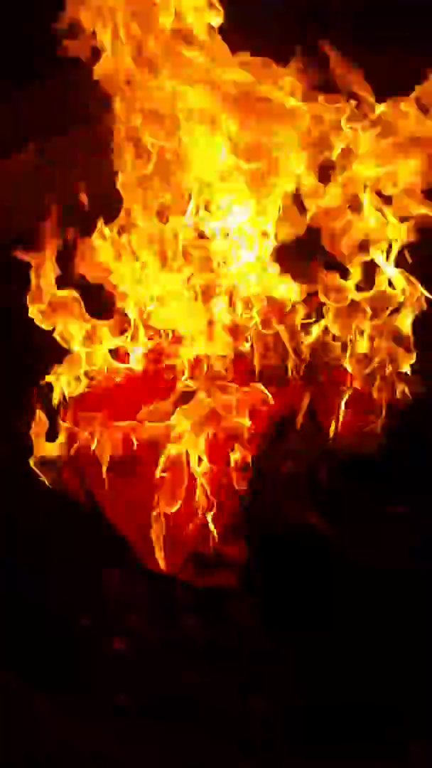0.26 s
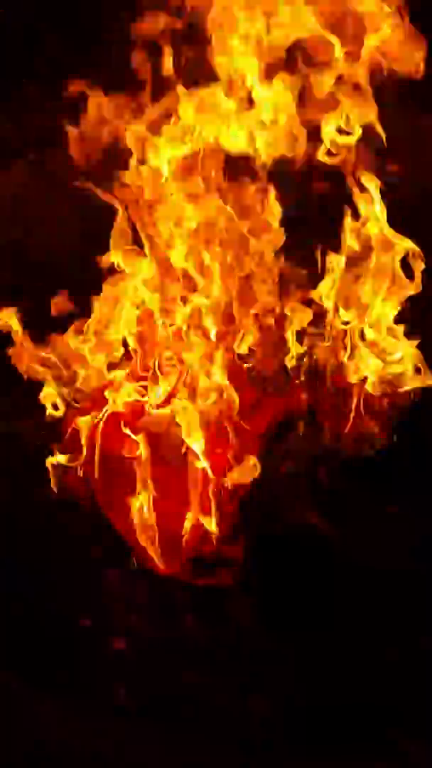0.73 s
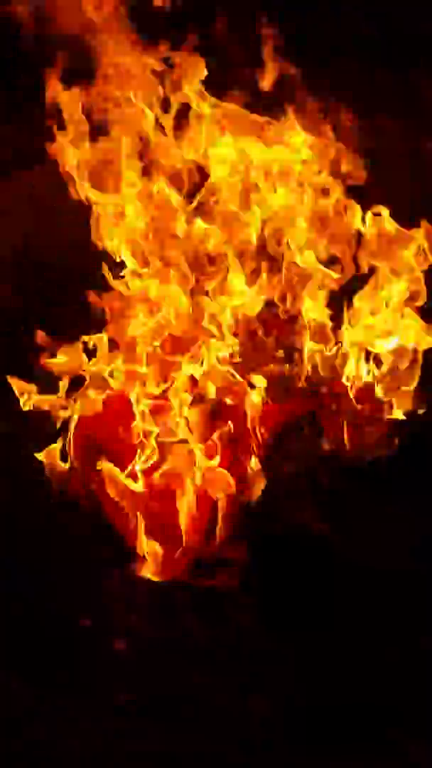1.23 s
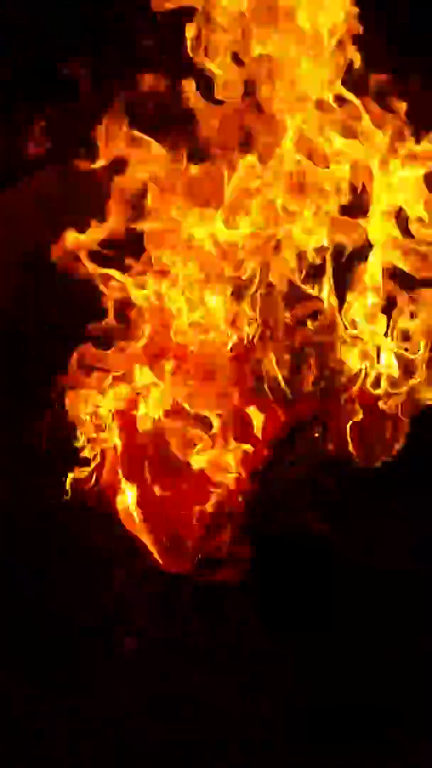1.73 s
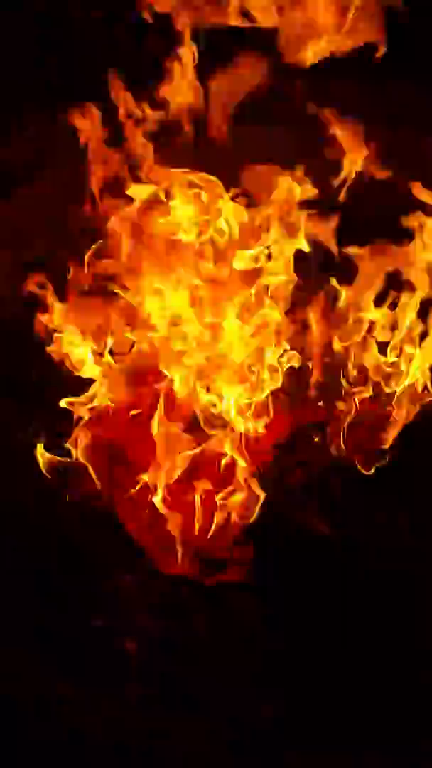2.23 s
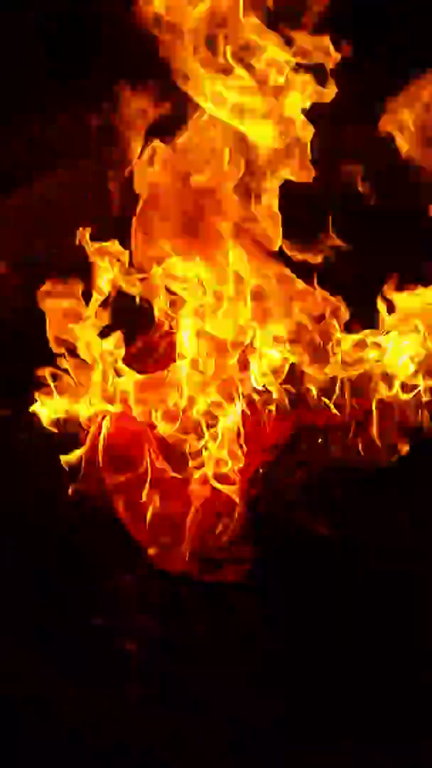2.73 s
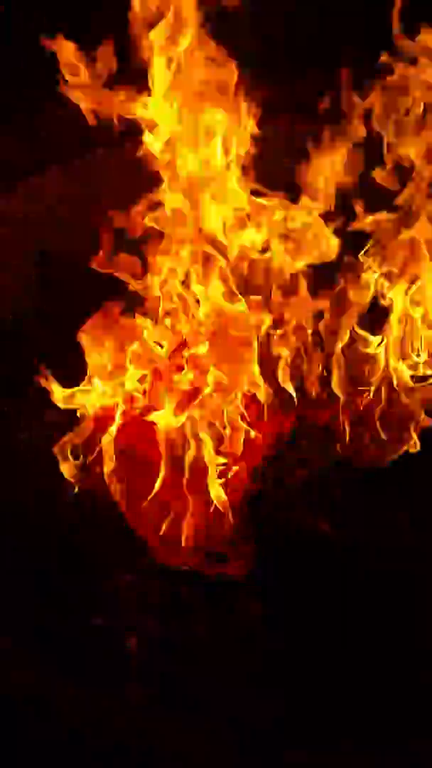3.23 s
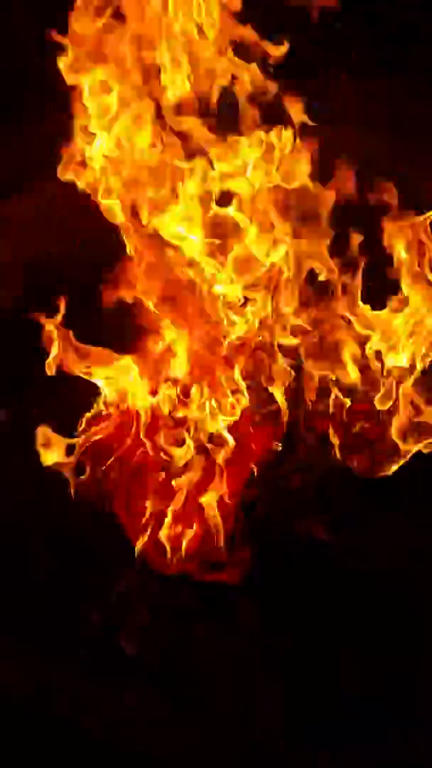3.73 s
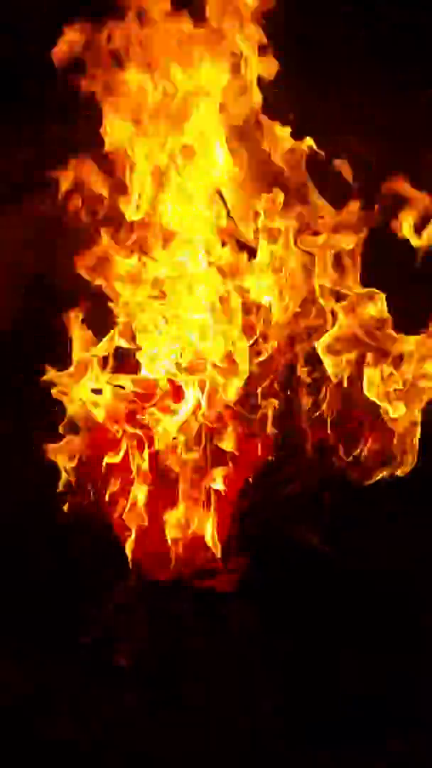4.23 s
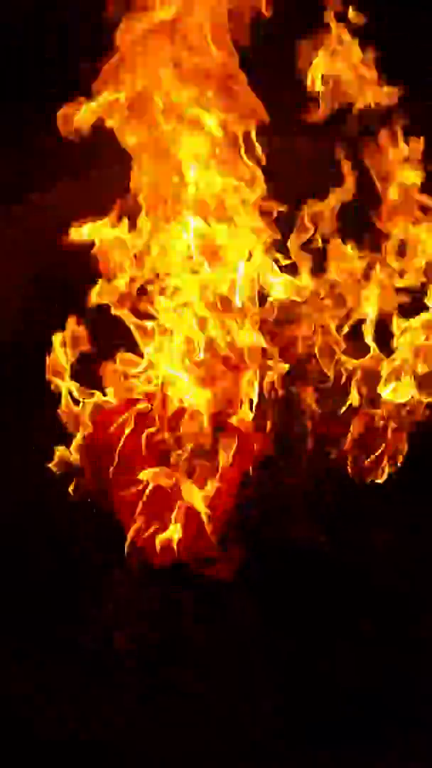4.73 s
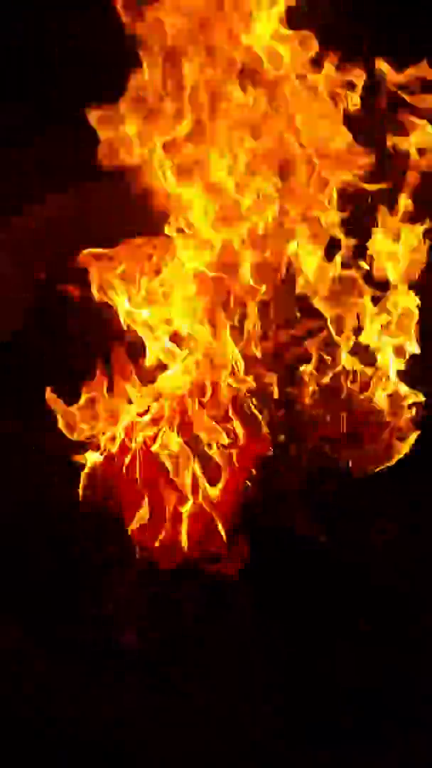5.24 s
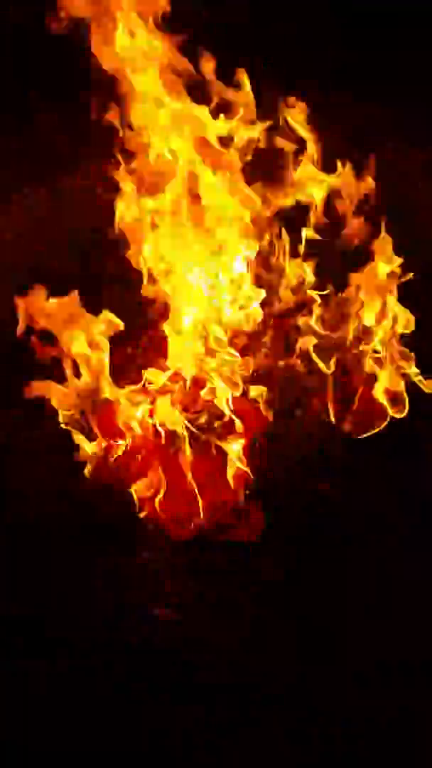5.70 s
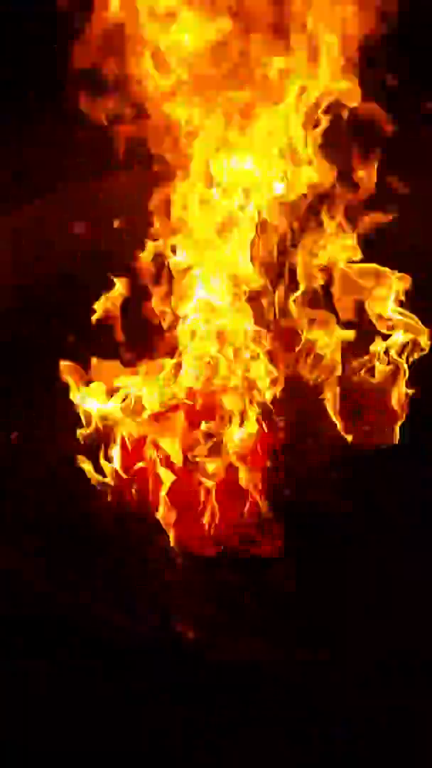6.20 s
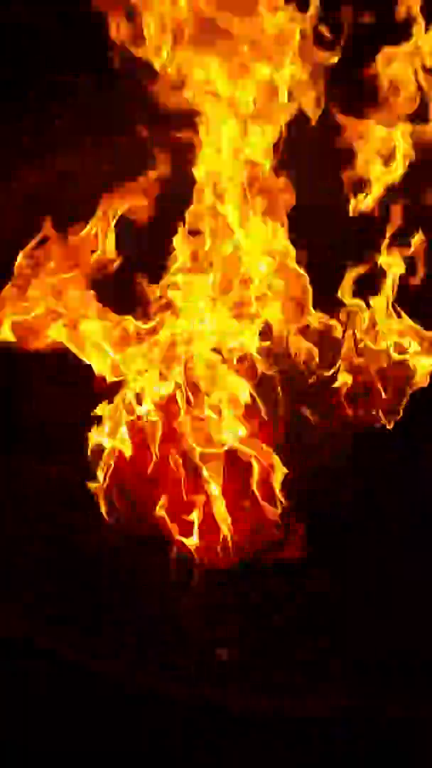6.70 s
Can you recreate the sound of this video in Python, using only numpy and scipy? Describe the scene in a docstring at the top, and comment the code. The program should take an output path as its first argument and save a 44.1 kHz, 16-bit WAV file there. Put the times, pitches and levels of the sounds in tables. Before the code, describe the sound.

A heap of cloth burns close to a handheld stereo microphone, outdoors at night. The sound swells in over the first second: a deep flame rumble under a fine, bright sizzle. Thin, sharp crackles scatter throughout, standing out around 0.6, 1.5, 3.2 and 4.1 seconds and clustering from 5.7 to 6.3. The sizzle peaks near 1.7 seconds, and the rumble gusts near 2.8, 4.1 to 4.5 and 6.5. Soft, dull pops come around 0.5, 2.6, 4.3 and 5.9 seconds. Insects chirr steadily all around, with short cricket trills and a steady high hiss mostly on the left. A distant engine holds a low hum, rising slightly in pitch, and fades out at about 4 seconds. After a momentary dip at 4.6 seconds, everything turns quieter and duller from about 5 to 5.7, then recovers and continues until about 7 seconds.

```python
"""A heap of cloth burns close to a two-port handheld microphone, outdoors at night.
Turbulent flames roar low and sizzle; snapping fibres crackle and pockets of gas pop.
All round, insects chirr as their strokes excite resonant wings, and an engine drones far off.
Steady bands of high hiss lie mostly on the left.
The whole sound swells in at the start and, after a brief dip, sinks for a second near the end."""
import sys
import numpy as np
from scipy import signal
from scipy.io import wavfile
from scipy.ndimage import map_coordinates

SR = 44100
rng = np.random.default_rng(int(sys.argv[2]) if len(sys.argv) > 2 else 0)


def file_out(sig):
    """Save sig as 16-bit WAV at sys.argv[1]."""
    # one column per channel
    cols = np.atleast_2d(sig).T
    # limit, then scale
    lim = np.clip(cols, -1, 1)
    pcm = np.round(lim * 32767).astype(np.int16)
    wavfile.write(sys.argv[1], SR, pcm)


N = 306936

# Deep gusts of the flames: centre_s, boost_db
FLAME_GUSTS = [(0.22, 2.5), (1.15, 1), (2.75, 4.5), (3.08, 2.5), (3.42, 1), (4.1, 3), (4.28, 2.5),
               (4.53, 3), (4.85, 2), (6.55, 4)]
# Flame noise spectrum, before rumble and rush are balanced: frequency_hz, relative_density_db
ROAR_SPECTRUM = [(20, -18), (45, -1), (70, 0.5), (89, 0), (110, -2.5), (150, -7.5), (290, -18.5),
                 (390, -24.5), (560, -26.5), (1000, -27.5), (1670, -37.5), (2400, -25)]
def flame_roar(level_db, sunk_db, gust_sigma_s=0.071, throb_hz=89.7):
    """Turbulent combustion: unsteady heat release radiates a deep rumble and a rush above it."""
    t = np.arange(N) / SR
    noise = banded_noise(ROAR_SPECTRUM, low_hz=20.24, patchy_db=1.56, count=21)
    rumble, rush = split(noise, hz=193)
    throb = resonate(rumble, throb_hz, width_hz=23)
    rumble = rms_one(rms_one(rumble) + amp(-9) * rms_one(throb))
    gust_db = sum(db * np.exp(-((t - s) / gust_sigma_s) ** 2 / 2) for s, db in FLAME_GUSTS)
    rumble *= amp(13 - 0.15 * sunk_db + gust_db)
    warm, thin = split(rms_one(rush), hz=567)
    rush = amp(2 - 0.12 * sunk_db) * warm + amp(0.5 + 0.6 * sunk_db) * thin   # duller when quieter
    return amp(level_db) * (rumble + rush)


# Spectrum shared by hiss and sizzle, before they are balanced: frequency_hz, relative_density_db
SIZZLE_SPECTRUM = [(1500, -45), (2200, -8), (3500, 11), (5200, 12), (6300, 12.5), (8200, -7), (10000, 2.5),
                   (13000, -6.5), (15500, 2.5)]
def flame_sizzle(level_db, sizzle_db, sunk_db, spits_per_s=170, spit_decay_s=0.0015, top_hz=16050):
    """Shot-noise modulation: above a smooth hiss, the treble leaps whenever a thread spits."""
    noise = banded_noise(SIZZLE_SPECTRUM, low_hz=1400, patchy_db=0.9, count=11)
    hiss, sizzle = split(noise, hz=7800)
    hiss = amp(level_db - 8.5 + 0.6 * sunk_db) * rms_one(hiss)
    spits = (rng.random(N) < spits_per_s / SR) * rng.exponential(1.0, N)
    grain = 1 + signal.lfilter([1], [1, -np.exp(-1 / (spit_decay_s * SR))], spits)
    lowpass = signal.cheby2(12, 40, top_hz, fs=SR, output="sos")
    sizzle = signal.sosfilt(lowpass, rms_one(sizzle * grain)) * amp(sizzle_db + 1.6 * drift(20))
    lower, upper = split(sizzle, hz=11500)
    return hiss + upper + amp(0.33 * sunk_db) * lower   # as the whole sound dips, the sizzle thins


def snap(noise, hz, crack_db, knock_db, bounce_s, clean):
    """Impulse response: a breaking fibre excites three damped bands; scattering and an echo follow."""
    t = np.arange(len(noise)) / SR
    ragged = noise * t * np.exp(-t / 0.00022)
    clean_break = clean * (np.arange(len(t)) == 5)
    burst = ragged / np.sqrt(np.sum(ragged ** 2)) + clean_break
    bright = resonate(resonate(burst, hz, 6500), 12500, 15000)
    crack = resonate(resonate(burst, 5400, 5000), 5400, 5000)
    knock = resonate(resonate(burst, 1800, 2600), 1800, 3000)
    click = rms_one(bright) + amp(crack_db) * rms_one(crack) + amp(knock_db) * rms_one(knock)
    heap_scatter = signal.fftconvolve(click, noise[::-1] * np.exp(-t / 0.004))[:len(t)]
    ground_bounce = np.roll(click, int(bounce_s * SR))
    return click + amp(-29) * heap_scatter + amp(-21) * ground_bounce


# Loudest snaps (crack and knock relative to the ring): start_s, gain_db, ring_hz, crack_db, knock_db
FIBRE_SNAPS = [(0.2145, -44, 12100, -5, -12), (0.444, -48, 10100, -10, -20), (0.5113, -43, 12800, -12, -12),
               (0.5318, -50, 9900, -12, -18), (0.5637, -55, 14000, -12, -22),
               (0.6492, -35.5, 12800, -12, -14), (0.6744, -47, 10500, -2, -22),
               (0.703, -52, 10000, -14, -20), (0.7353, -50, 10300, -14, -20),
               (0.7722, -53, 10100, -8.5, -6), (0.8369, -38, 9900, -19, -17), (0.853, -48, 11000, -2, -14),
               (0.9383, -53, 14000, -14, -20), (0.9523, -50, 14000, -12, -17.5),
               (0.9975, -53, 13000, -6, 1), (1.1054, -40.5, 12900, -10, -19), (1.1638, -46, 11500, -3, -25),
               (1.1895, -43, 14100, -12, -25.5), (1.2198, -40, 11400, -11, -18),
               (1.2883, -49, 12700, -7, 0), (1.3145, -48.5, 14000, -10, -22),
               (1.4101, -46, 12280, 3.5, -2.5), (1.5398, -32, 10000, -9.5, -21.5),
               (1.6155, -38, 12800, -5, -15.5), (1.6259, -35, 9900, -10, -18),
               (1.6702, -37.5, 10900, -28.5, -17), (1.7435, -53, 10000, -14, -22),
               (1.7699, -48, 10100, -14, -22), (1.8149, -35.5, 12100, -26, -9),
               (1.8836, -41.5, 12700, -23, -10), (1.9026, -49, 11000, -14, -22),
               (1.9344, -44, 11300, -8, -29), (2.0315, -38.5, 12400, -8, -28),
               (2.1581, -56, 13800, -14, -22), (2.1825, -49, 10200, -14, -22),
               (2.1902, -44, 11400, -18, -3.5), (2.3618, -49, 13400, -13, -19),
               (2.5088, -48, 10000, -12, -22), (2.5488, -41, 11200, -7, -26),
               (2.5691, -48, 14000, -14, -20), (2.594, -43, 11800, -13, -13), (2.6596, -41.5, 9500, 0, -11),
               (2.7428, -39, 10900, -20.5, -22), (2.7851, -61, 14000, -14, -20),
               (3.2018, -32, 8750, -6, -16.5), (3.4234, -37, 10500, -16, -25),
               (3.434, -43, 11600, -14, -18), (3.498, -54, 10500, -14, -18.5),
               (3.5823, -53, 13600, -14, -20), (3.6047, -45, 9900, 0, -7), (3.686, -46, 10400, -15, -23.5),
               (3.73, -53, 10000, -10, -19.5), (3.7659, -53, 13000, -6, -1), (3.7998, -59, 12700, -9, -20),
               (3.8243, -45, 13400, -8, -10), (3.9339, -41.5, 12300, -24, -28),
               (3.9644, -48, 12000, -14, -20), (4.0218, -50, 12400, -14, -20),
               (4.0536, -45, 10600, -11, -12), (4.0609, -37.5, 12000, -5, -27),
               (4.0999, -34.5, 11900, -26, -18), (4.1267, -33, 11200, -7, -17.5),
               (4.1643, -41, 11700, -22, -27), (4.2574, -39.5, 10700, -4, -24),
               (4.3346, -46, 10800, -12.5, -20), (4.3576, -47, 11100, -11, -17),
               (4.399, -44.5, 12200, -12, -31), (4.45, -37.5, 11500, -12, -24),
               (4.4797, -43, 10400, -12, -29), (4.598, -47, 9800, -16, -17),
               (4.6137, -37.5, 11400, -3.5, -10), (4.7146, -44.5, 14700, -10.5, -12),
               (4.7547, -51, 13400, -12, -20), (4.7925, -38, 11400, -13, -50),
               (4.8335, -51, 14000, -12, -22), (4.8684, -51, 14000, -16, -26),
               (4.9263, -44, 12700, -15, -33.5), (4.98, -48.5, 13500, -10, -27.5),
               (5.0098, -42.5, 11300, -28, -29), (5.055, -53, 12500, -12, -20),
               (5.09, -57, 12700, -12, -20), (5.111, -49, 12500, -13, -16), (5.1463, -43, 14000, -20, -29),
               (5.2191, -55, 13000, -6, -13), (5.2391, -55, 10000, -12, -20), (5.286, -58, 10400, -9, -20),
               (5.3014, -42, 13100, -14, -29.5), (5.4097, -53, 9800, -4, -14),
               (5.472, -59, 10200, -12, -22), (5.5289, -45.5, 12600, -7, -29),
               (5.639, -59, 13000, -12, -20), (5.7048, -50, 11500, -1.5, -23),
               (5.7164, -37.5, 13800, -9, -24), (5.7585, -36, 13600, -8, -29),
               (5.7953, -47, 11300, -13, -10), (5.8342, -55, 14000, -12, -14),
               (5.9083, -38.5, 13300, -8, -22), (5.9235, -37.5, 11900, -10, -12),
               (5.9425, -38, 12600, -29, -34), (5.9593, -41, 12400, -10, -28),
               (5.995, -34, 10600, -15, -24), (6.0235, -35, 13200, -21, -31),
               (6.0425, -35.5, 13400, -14, -22), (6.0692, -47, 14000, -14, -22),
               (6.137, -46, 11000, -2, -14), (6.1659, -46, 9700, -11, -20),
               (6.2296, -38.5, 11900, -17, -28), (6.2442, -35.5, 11800, -20, -22),
               (6.2677, -53, 12000, -4, 3), (6.2947, -54, 10700, -14, -20), (6.35, -44, 10700, -7, -10),
               (6.5064, -43, 14600, -10, -16), (6.5286, -44, 11300, -22, -10),
               (6.6279, -41, 11700, -20, -22), (6.6506, -43, 13400, -16, -25),
               (6.7431, -50, 10100, -12, -8), (6.7804, -44, 11400, -14, -18)]
def crackles(sizzle_db, size=800, faint_count=14, pan_spread_db=2.5):
    """Acoustic emission: fibres fracture in clicks, which reach the two ports in partly unlike shapes."""
    snaps = list(FIBRE_SNAPS)
    for when, strong, bright, woody in rng.random((faint_count, 4)):
        at = (N - 1) * when
        db = sizzle_db[int(at)] - 9 + 5 * strong ** 2   # faint snaps follow the sizzle
        snaps.append((at / SR, db, 9000 + 5000 * bright, -14 + 12 * woody, -27 + 14 * woody))
    out = np.zeros((2, N + size))
    noises = rng.standard_normal((len(snaps), 2, size))
    bounces_s = rng.uniform(0.0015, 0.004, len(snaps))
    pans_db = pan_spread_db * rng.standard_normal(len(snaps))
    for row, (mid, side), bounce_s, pan_db in zip(snaps, noises, bounces_s, pans_db):
        s, db, hz, crack_db, knock_db = row
        shared = snap(mid, hz, crack_db, knock_db, bounce_s, clean=1.4)
        apart = snap(side, hz, crack_db, knock_db - 5, bounce_s, clean=0)
        pair = 0.73 * shared + 0.6 * apart * [[1], [-1]]
        out[:, int(s * SR):int(s * SR) + size] += panned(pair, pan_db) * amp(db)
    return out[:, :N]


# Dull pops in the heap: start_s, level_db, pitch_hz
GAS_POPS = [(0.393, -59, 600), (0.545, -59.5, 700), (2.592, -54.5, 600), (2.61, -53, 600),
            (3.036, -57.5, 790), (4.051, -61, 720), (4.289, -55, 700), (4.318, -50, 705),
            (5.797, -62.5, 1300), (5.858, -68, 1500), (5.913, -57, 700)]
def pops(size=1200):
    """Heavily damped oscillation: a bursting pocket of gas gives a blunt puff of a few cycles."""
    out, t = np.zeros(N + size), np.arange(size) / SR
    for (s, db, hz), noise in zip(GAS_POPS, rng.standard_normal((len(GAS_POPS), size))):
        pulse = (0.4 * noise + 1) * t * np.exp(-3 * t * hz)
        puff = resonate(resonate(pulse, hz, hz), hz, 1.4 * hz)
        out[int(s * SR):int(s * SR) + size] += amp(db) * rms_one(puff)
    return out[:N]


def wing_strokes(hz, t60_s, per_s, size=N):
    """Stridulation: an insect's uneven strokes drive its wing resonance in a train of tone bursts."""
    count = int(size / SR * per_s) + 2
    jitter, strength = rng.standard_normal((2, count))
    at = (np.cumsum(1 + 0.12 * jitter) - rng.random()) * SR / per_s
    clicks = np.bincount(np.clip(at, 0, size).astype(int), amp(2.25 * strength), size + 1)[:size] + 1e-18
    width_hz = np.log(1000) / (np.pi * t60_s)
    return rms_one(resonate(resonate(clicks, hz, width_hz), hz, width_hz))


# Kinds of singer: wing_hz, spread_hz, ring_t60_s, strokes_per_s, relative_level_db, pan_db
INSECT_KINDS = [(2488, 68, 0.0073, 60, -8, -0.5), (2990, 108, 0.017, 62, 3, 3.5),
                (5730, 260, 0.0093, 62, -7, 10.5), (7050, 180, 0.012, 62, 4, 1.5)]
def insect_chorus(singers=6):
    """Incoherent summation: detuned singers blend into a chirr, a separate crowd in each channel."""
    out = np.zeros((2, N))
    for hz, spread_hz, t60_s, per_s, db, pan_db in INSECT_KINDS:
        crowd = np.zeros((2, N))
        for channel in crowd:
            for detune in np.linspace(-1.5, 1.5, singers):
                song = wing_strokes(hz + spread_hz * detune, t60_s, per_s * rng.uniform(0.9, 1.1))
                channel += song * amp(-1.8 * detune ** 2)
            channel *= amp(0.63 * drift(3))
        out += panned(rms_one(crowd), pan_db) * amp(db)
    return out


# Trills of single crickets: start_s, length_s, wing_hz, glide_hz_per_s, relative_level_db
CRICKET_TRILLS = [(0.35, .2, 5760, 0, -12), (.85, .2, 5760, 0, -10), (1.45, .12, 5920, 0, -9),
                  (1.5, 0.28, 5630, 0, -4.5), (1.72, .17, 5750, 200, -8), (1.93, 0.13, 5930, 0, -7),
                  (2.0, .13, 5700, 0, -9), (2.62, 0.2, 5950, -300, -10), (2.76, 0.2, 5530, -300, -10),
                  (2.98, .27, 5620, 300, -7), (3.28, 0.24, 5720, 400, -10), (3.52, .26, 5890, 700, -9),
                  (4.08, .28, 5550, -600, -8.5), (5.35, .22, 5660, 0, -6), (5.8, 0.22, 5490, 0, -6),
                  (6.68, 0.28, 5830, 800, -9)]
def crickets(waver_hz=45, edge_s=0.039):
    """Frequency modulation: the wing tone glides and wavers within each short, soft-edged trill."""
    out, waver, t = np.zeros(N + SR), drift(8), np.arange(SR // 2) / SR
    for s, length_s, hz, glide_hz_per_s, db in CRICKET_TRILLS:
        start = int(s * SR)
        gate = np.clip(np.minimum(t, length_s - t) / edge_s, 0, 1)
        bend_hz = glide_hz_per_s * (t - length_s / 2) + waver_hz * np.resize(waver[start:], len(t))
        steady = wing_strokes(hz, t60_s=0.014, per_s=60, size=len(t))
        bent = map_coordinates(steady, [np.cumsum(1 + bend_hz / hz)], order=3)
        out[start:start + len(t)] += bent * gate * amp(db)
    return panned(out[:N], pan_db=14)


def far_engine(pitch_hz=133.3, rise_hz_per_s=2.7, leaves_s=3.78, fade_db_per_s=63):
    """Periodic exhaust flow: a near-pure note rises with engine speed and fades as it draws away."""
    t = np.arange(N) / SR
    db = 9 - 0.5 * t - fade_db_per_s * np.maximum(t - leaves_s, 0)
    waver_db = 1.2 * drift(3)
    cycles = pitch_hz * t + rise_hz_per_s * t * t / 2 + rng.random()
    return amp(db + waver_db) * np.sqrt(2) * np.sin(2 * np.pi * cycles)


# Steady bands of high hiss, mostly on the left: centre_hz, width_hz, relative_level_db, pan_db
HISS_BANDS = [(3590, 990, -5.5, 13.5), (4140, 780, -4, 18), (4774, 350, -9.5, 9.5), (6290, 1700, -6, 9)]
def high_hiss():
    """Band-pass filtering: white noise, independent in each channel, narrows to bands of hiss."""
    out = np.zeros((2, N))
    for hz, width_hz, db, pan_db in HISS_BANDS:
        band = resonate(resonate(rng.standard_normal((2, N)), hz, width_hz), hz, width_hz)
        out += panned(rms_one(band), pan_db) * amp(db)
    return out


# Likeness of the fire's noise at left and right: frequency_hz, correlation
PORT_COHERENCE = [(30, 1), (60, 0.97), (125, 0.99), (250, 0.92), (500, 0.58), (1000, 0.22), (2000, 0.13),
                  (15000, 0.022)]
def banded_noise(spectrum, low_hz, patchy_db, count):
    """Partial coherence: flickering third-octave noise bands, less alike in stereo toward the treble."""
    out, common_flicker = 0, drift(3)
    edges = low_hz * 2 ** (np.arange(count + 1) / 3)
    white = rng.standard_normal((2, 2, N))
    for k, (low, high) in enumerate(zip(edges, edges[1:])):
        bandpass = signal.butter(2, [low, high], "band", fs=SR, output="sos")
        mid, side = signal.sosfilt(bandpass, white[k % 2])
        hz = np.sqrt(low * high)
        alike = at_hz(PORT_COHERENCE, hz)
        gain = amp(at_hz(spectrum, hz) + patchy_db * (0.44 * common_flicker + drift(13)))
        out = out + gain * (np.sqrt(1 + alike) * mid + np.sqrt(1 - alike) * side * [[1], [-1]])
    return rms_one(out)


def resonate(x, hz, width_hz):
    """Two-pole resonance with unit peak gain."""
    r, w = np.exp(-np.pi * width_hz / SR), 2 * np.pi * min(hz, SR / 2.2) / SR
    return signal.lfilter(np.array([1, 0, -1]) * (1 - r * r) / 2, [1, -2 * r * np.cos(w), r * r], x)


def split(x, hz):
    """Crossover: the parts below and above a frequency."""
    return [signal.sosfilt(signal.butter(4, hz, kind, fs=SR, output="sos"), x) for kind in ("low", "high")]


def drift(rate_hz, hop=40, settle=2000):
    """Low-passed noise: a slow random fluctuation of unit rms."""
    r = np.exp(-2 * np.pi * hop * rate_hz / SR)
    slow = signal.lfilter([1], [1, -2 * r, r * r], rng.standard_normal(N // hop + settle + 2))[settle:]
    return np.interp(np.arange(N) / hop, np.arange(len(slow)), rms_one(slow))


def amp(db):
    """Decibels to amplitude ratio."""
    return 10 ** (np.asarray(db) / 20)


def rms_one(x):
    """Normalisation to unit rms."""
    return x / np.sqrt(np.mean(x ** 2) + 1e-20)


def in_time(curve):
    """Linear interpolation of a curve at every sample."""
    return np.interp(np.arange(N) / SR, *np.transpose(curve))


def at_hz(spectrum, hz):
    """Interpolation on a logarithmic frequency axis."""
    frequencies, values = np.transpose(spectrum)
    return np.interp(np.log(hz), np.log(frequencies), values)


def panned(x, pan_db):
    """Level-difference panning: pan_db is left minus right."""
    return x * amp([[pan_db / 2], [-pan_db / 2]])


# Envelope of the flames and the background: time_s, level_db
OVERALL_LEVEL = [(0.0, -61), (0.22, -58), (0.6, -52.5), (1.0, -51.5), (4.42, -51.5), (4.614, -51.5),
                 (4.625, -62), (4.645, -53), (5.05, -60.5), (5.42, -59.5), (6.15, -51.5), (6.4, -50.5),
                 (6.96, -51.5)]
# Envelope of the bright sizzle: time_s, level_db
SIZZLE_LEVEL = [(0.0, -69), (0.2, -51.5), (0.39, -51.5), (0.81, -48), (1.25, -54), (1.7, -42), (2.25, -54),
                (3.61, -47), (4.4, -51.5), (4.82, -53), (5.3, -61), (5.6, -61.5), (5.87, -50.5),
                (6.14, -49), (6.96, -49.5)]
def scene():
    """Superposition: steady layers share one envelope; sizzle, snaps and pops carry their own levels."""
    level_db, sizzle_db = in_time(OVERALL_LEVEL), in_time(SIZZLE_LEVEL)
    sunk_db = level_db - level_db.max()
    flames = flame_roar(level_db, sunk_db) + flame_sizzle(level_db, sizzle_db, sunk_db)
    background = amp(level_db) * (insect_chorus() + high_hiss() + crickets() + far_engine())
    return flames + crackles(sizzle_db) + pops() + background


# Microphone inlets, left then right: resonance_hz, width_hz, boost_db
INLETS = [(4200, 1500, 3), (10000, 1500, 2)]
def record(dry, cutoff_hz=17000):
    """Cavity resonance: each inlet boosts its own band, and a low-pass filter cuts the top."""
    ports = [x + (amp(boost_db) - 1) * resonate(x, hz, width_hz)
             for x, (hz, width_hz, boost_db) in zip(dry, INLETS)]
    return signal.sosfilt(signal.cheby2(16, 70, cutoff_hz, fs=SR, output="sos"), np.array(ports))


dry = scene()
out = record(dry)
file_out(out)
```